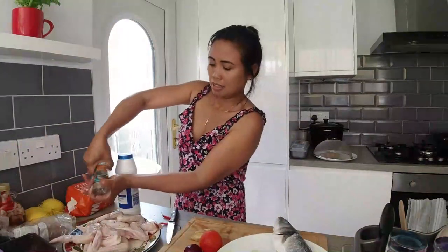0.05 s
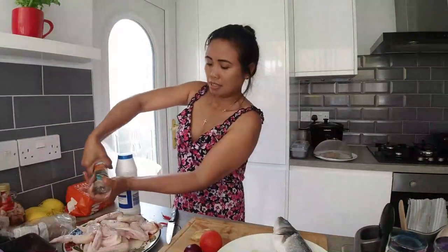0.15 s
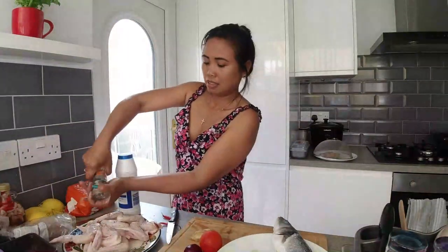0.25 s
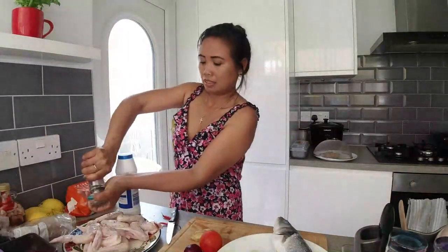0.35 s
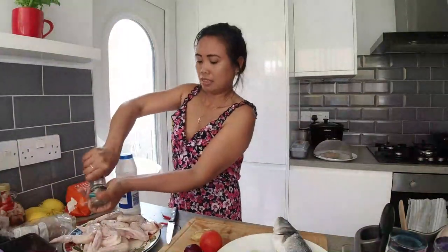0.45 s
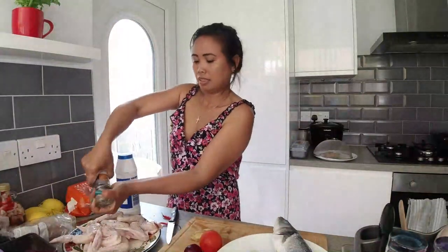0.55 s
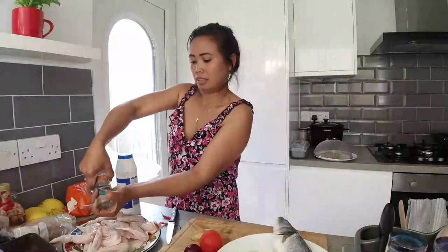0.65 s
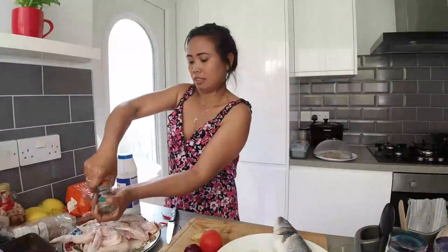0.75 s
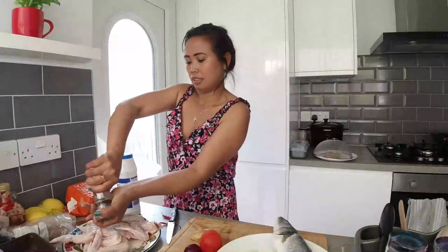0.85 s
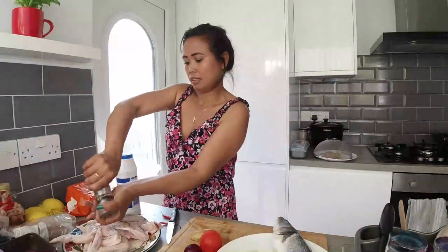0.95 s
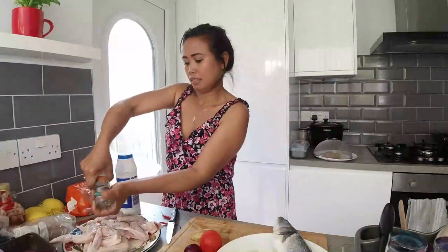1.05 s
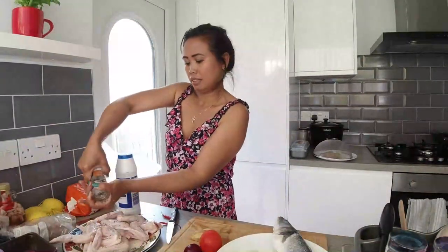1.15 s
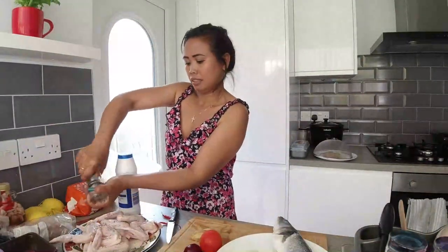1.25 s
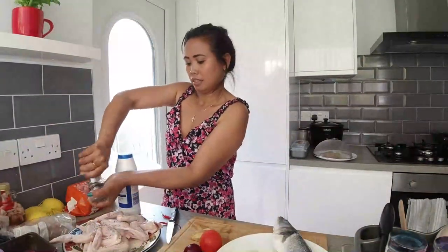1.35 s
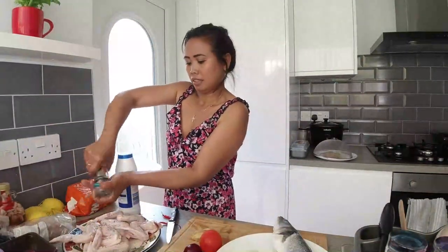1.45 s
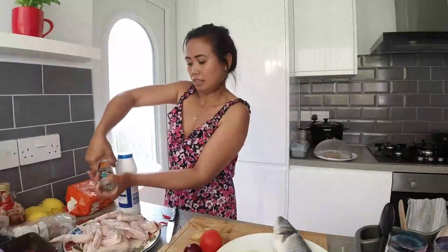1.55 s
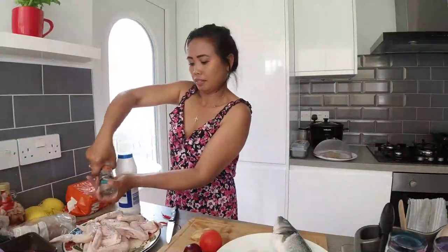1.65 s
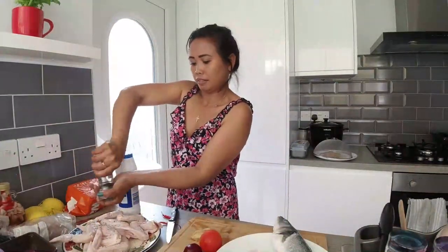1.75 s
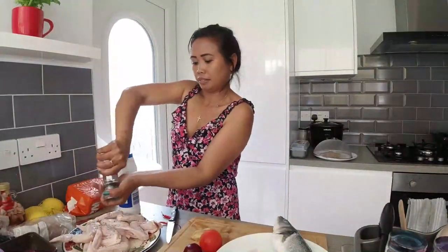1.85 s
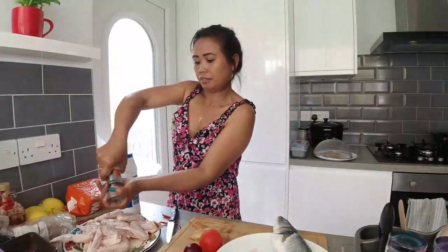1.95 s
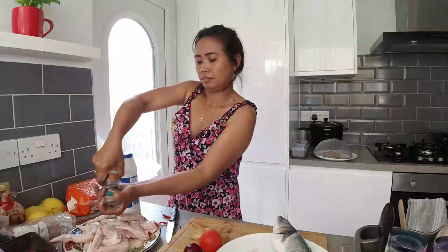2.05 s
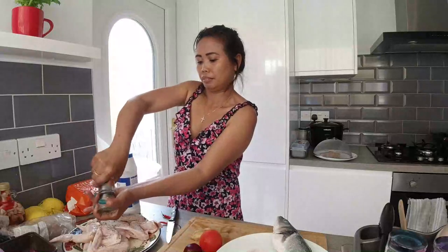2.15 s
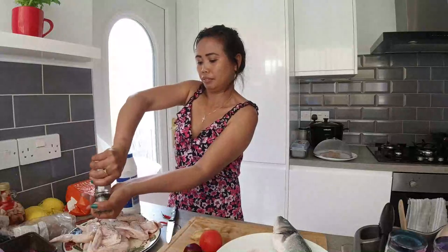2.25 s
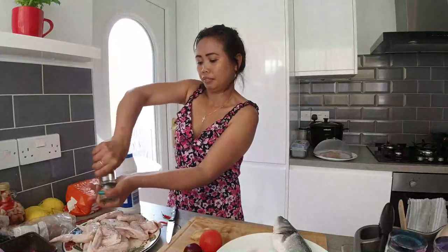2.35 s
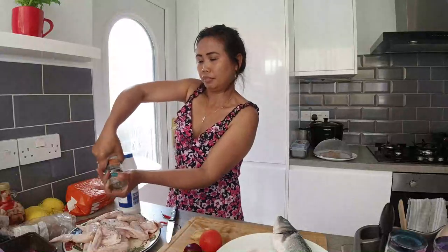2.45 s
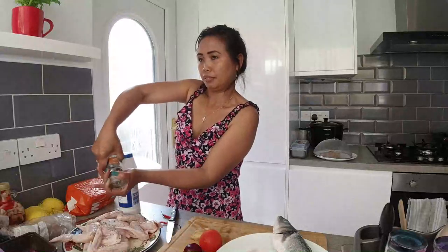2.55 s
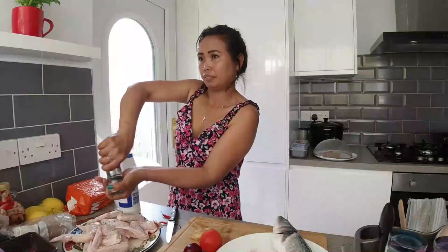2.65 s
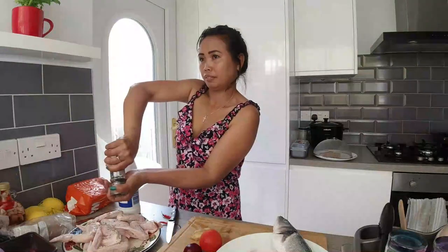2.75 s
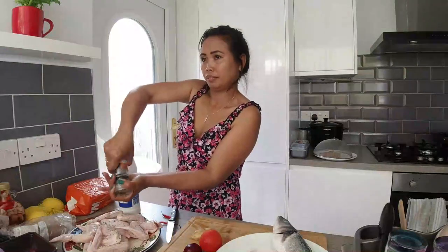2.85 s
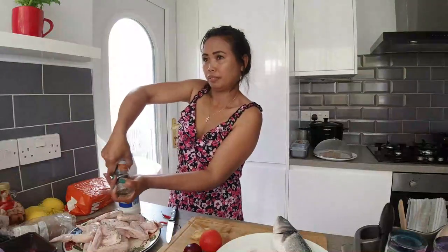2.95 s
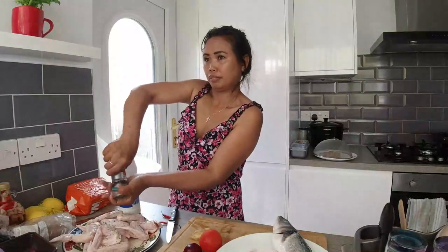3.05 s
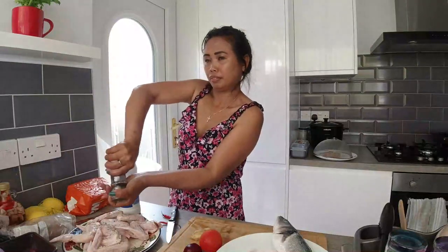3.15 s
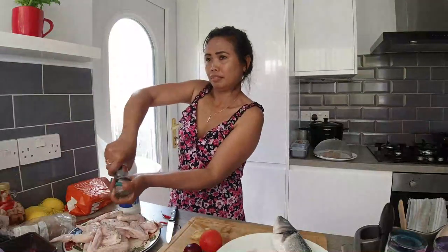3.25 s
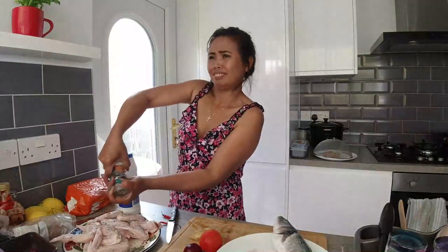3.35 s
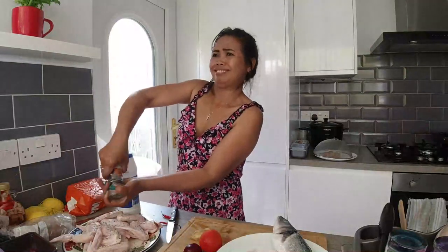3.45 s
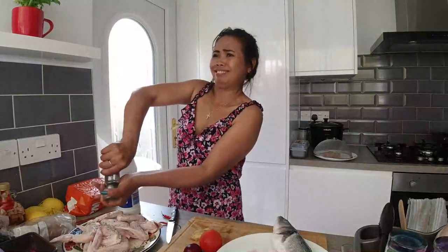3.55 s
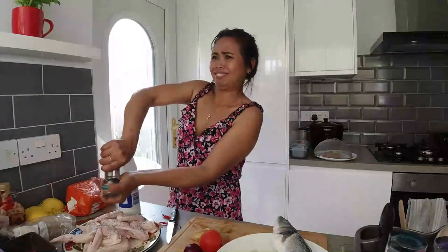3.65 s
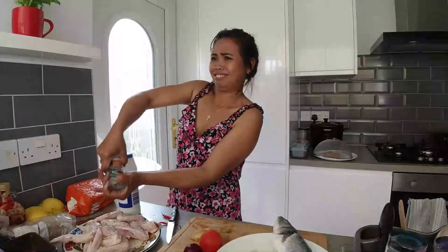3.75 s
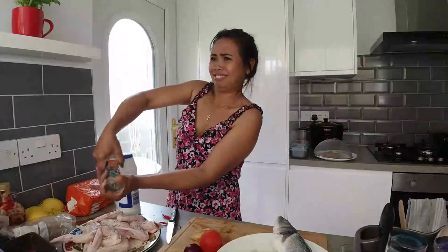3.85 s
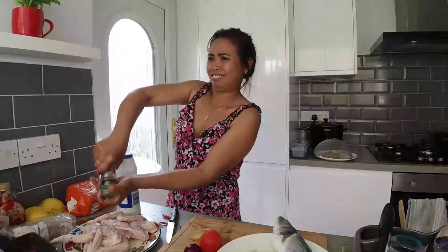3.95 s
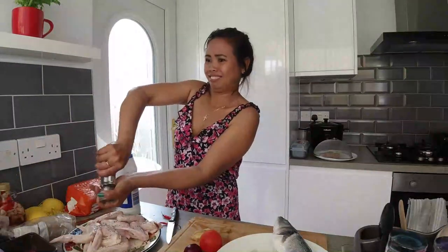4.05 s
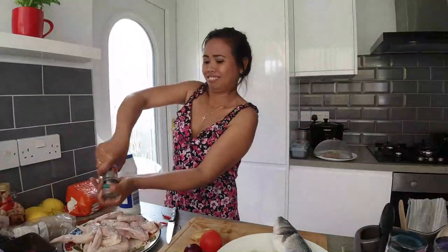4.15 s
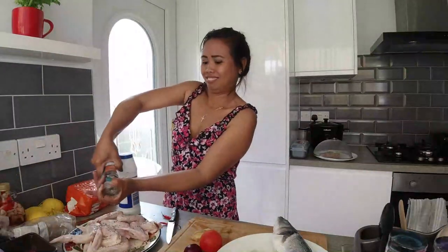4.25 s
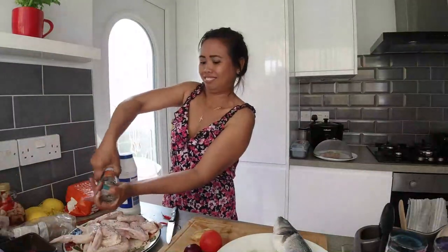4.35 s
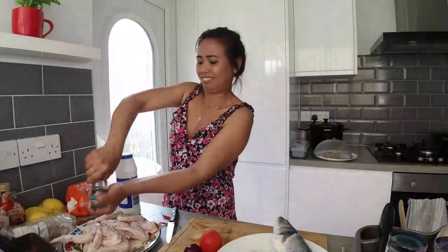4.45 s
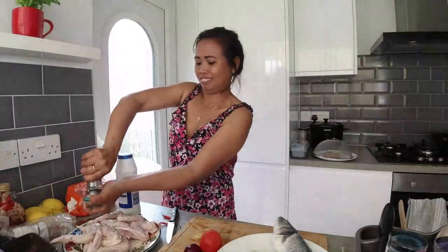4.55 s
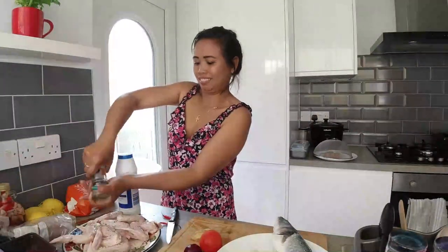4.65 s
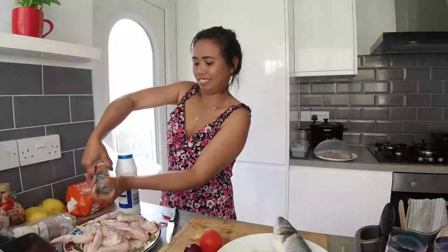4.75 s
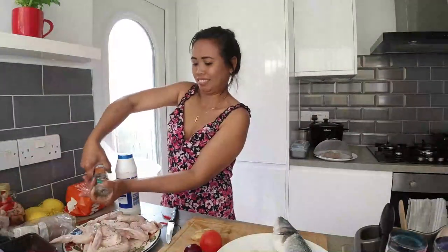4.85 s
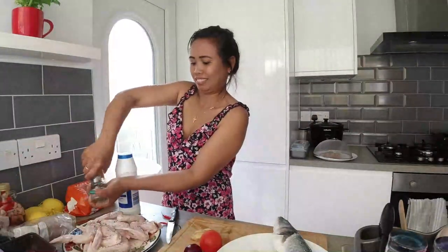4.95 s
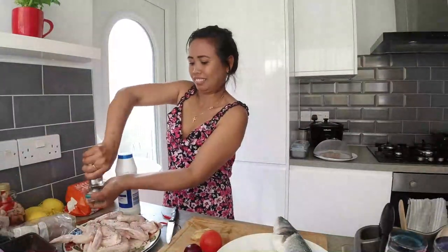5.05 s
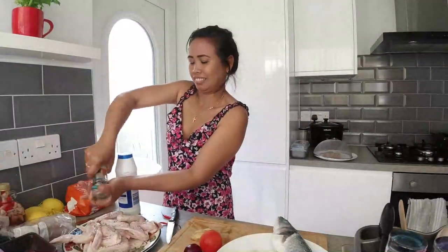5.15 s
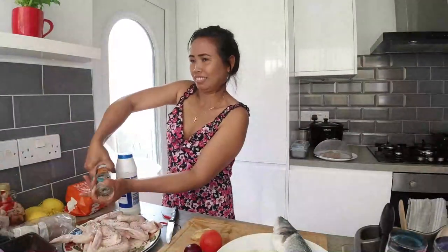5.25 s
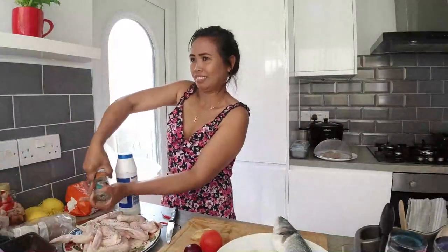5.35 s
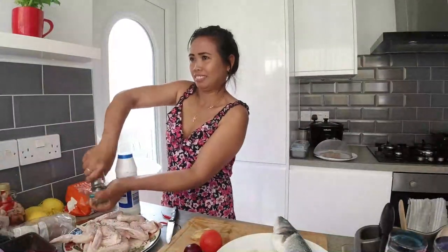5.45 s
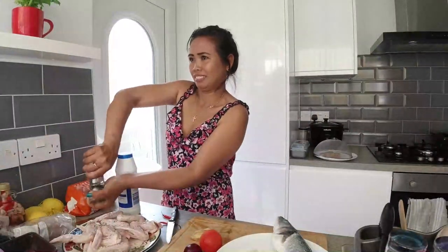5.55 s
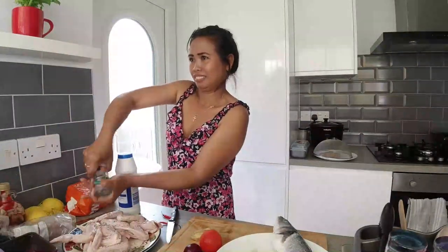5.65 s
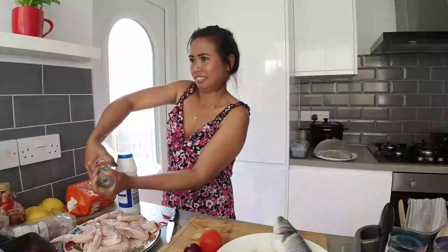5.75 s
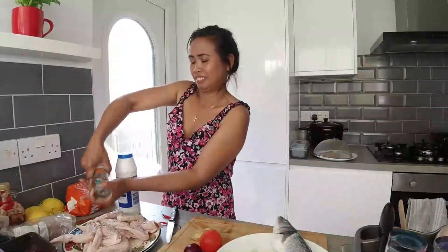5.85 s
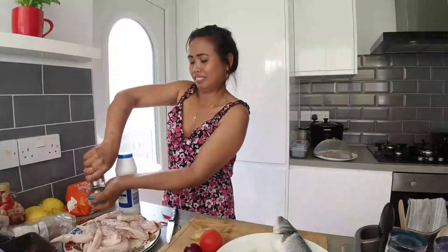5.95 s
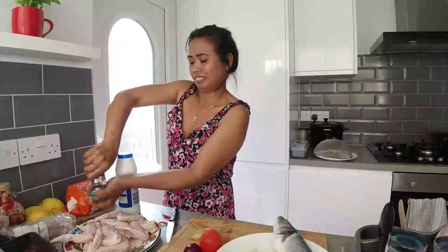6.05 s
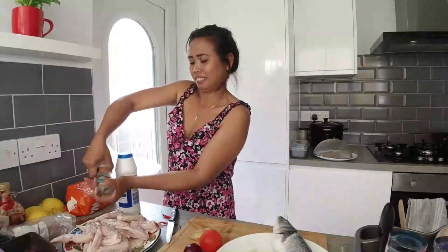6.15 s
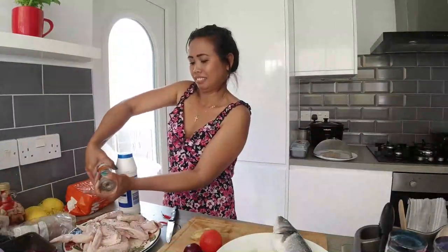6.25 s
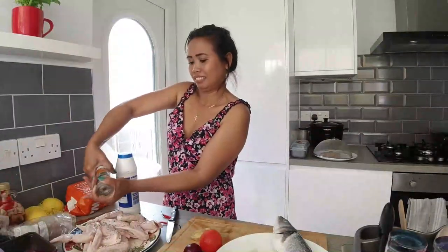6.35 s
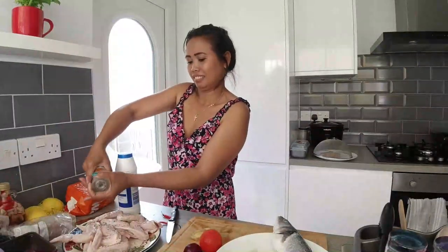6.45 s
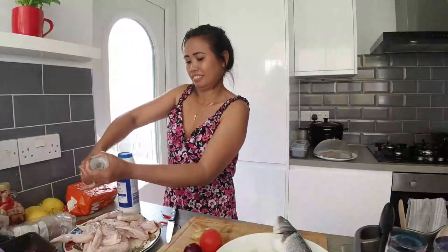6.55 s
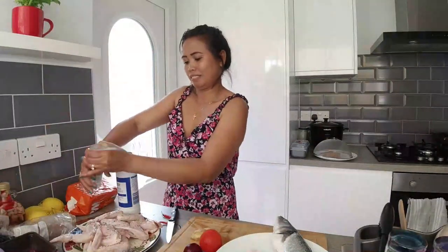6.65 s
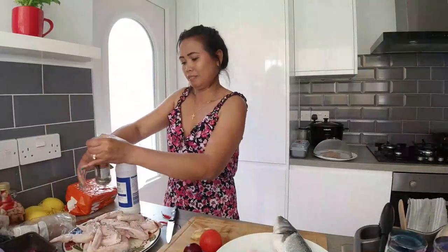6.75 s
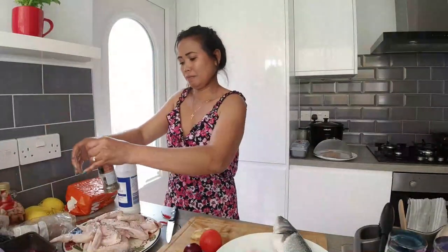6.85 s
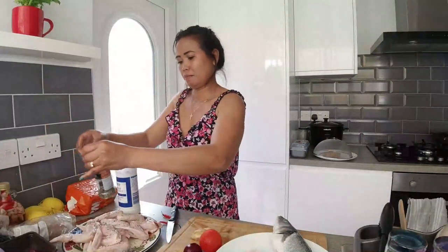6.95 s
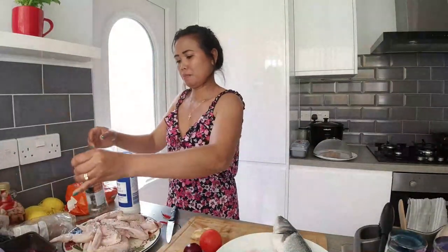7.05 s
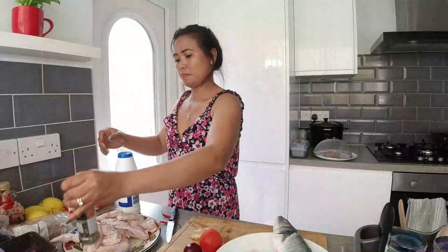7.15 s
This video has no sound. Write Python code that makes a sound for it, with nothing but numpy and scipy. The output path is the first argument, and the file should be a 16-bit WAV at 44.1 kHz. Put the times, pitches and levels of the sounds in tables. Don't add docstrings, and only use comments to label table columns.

```python
import sys
import numpy as np
from scipy import signal
from scipy.fft import rfft, irfft, next_fast_len
from scipy.io import wavfile
from scipy.ndimage import uniform_filter1d

SR = 44100
rng = np.random.default_rng(int(sys.argv[2]) if len(sys.argv) > 2 else 0)


def master(y):
    cut = np.clip(np.atleast_2d(y).T, -1, 1)
    pcm = np.round(cut * 32767)
    wavfile.write(sys.argv[1], SR, pcm.astype(np.int16))


def makeup_ratio(level_db):
    decades = np.asarray(level_db, float) / 20
    return 10 ** decades


N = 317520


def evened(x):
    return x / np.sqrt(np.mean(x ** 2) + 1e-20)


def wander(shape, size):
    smooth = uniform_filter1d(rng.standard_normal(shape), size=size)
    return evened(uniform_filter1d(smooth, size=size))


def read(points, hz, count=1):
    table = np.transpose(points)
    return np.interp(np.log(hz + 1), np.log(table[0] + 1), table[count])


def resonate(x, hz, width):
    return signal.lfilter(*signal.iirpeak(hz, hz / width, SR), x)


def ring(part):
    edges_hz, broad_db, modes = part
    band = signal.butter(2, edges_hz, "band", fs=SR, output="sos")
    tap = signal.sosfilt(band, np.eye(1, 2048)[0])
    out = makeup_ratio(broad_db) * evened(tap)
    for hz, width_hz, level_db in modes:
        out = out + makeup_ratio(level_db) * evened(resonate(tap, hz, width_hz))
    return out / np.linalg.norm(out)


# frequency_hz, density_db (per Hz)
AIR = [(20, -1.5), (60, -13.5), (170, -6.5), (380, -21), (900, -30.5), (5400, -45.5), (10000, -51.5),
       (16000, -60)]
# frequency_hz, likeness (0 to 1)
AIR_SAME = [(60, 0.92), (400, 0.97), (1500, 0.54), (5000, 0.15)]


def air():
    hz = np.fft.rfftfreq(N, 1 / SR)
    a, b = rfft(rng.standard_normal((2, N)))
    same = np.clip(read(AIR_SAME, hz), 0, 1)
    pair = np.array([a, same * a + np.sqrt(1 - same ** 2) * b])
    return makeup_ratio(-54) * evened(irfft(pair * makeup_ratio(read(AIR, hz)), N))


# frequency_hz, width_hz, level_db
HUM = [(49.95, 6.5, -55.5), (98, 11, -63), (135.1, 4.7, -58.5), (231.4, 18, -50.5), (274, 16, -57),
       (344.7, 10, -63.5)]


def fridge():
    out = np.zeros(N)
    for hz, width_hz, level_db in HUM:
        tone = resonate(resonate(rng.standard_normal(N), hz, width_hz), hz, width_hz)
        out += makeup_ratio(level_db) * evened(tone)
    return out


# frequency_hz, t60_s, level_db
KITCHEN = [(200, 0.086, -1), (803, 0.18, 0.6), (2710, 0.26, -0.5), (5890, 0.19, 0.4), (10300, 0.14, 3),
           (15000, 0.11, 3)]


def kitchen(x):
    size = SR // 2
    taps = np.zeros((2, size))
    at = np.arange(120, size - 20, 16) + rng.integers(0, 16, (2, (size - 141) // 16 + 1))
    np.put_along_axis(taps, at, rng.choice([-1., 1.], at.shape), 1)
    build_up = 1 - np.exp(-np.arange(size) / SR / 0.0009)
    hz, t, z = signal.stft(taps * build_up, SR, nperseg=128)
    same = np.clip(read(AIR_SAME, hz), 0, 1)[:, None]
    z[1] = same * z[0] + np.sqrt(1 - same ** 2) * z[1]
    decay_db = read(KITCHEN, hz, count=2)[:, None] - 60 * t / read(KITCHEN, hz)[:, None]
    tail = signal.istft(z * makeup_ratio(decay_db), SR, nperseg=128)[1]
    return signal.oaconvolve(x[None], tail / np.linalg.norm(tail[0]), axes=1)[:, :N]


def ports(x):
    lag_s = 5.5e-5
    size = next_fast_len(N)
    phase = np.exp(-2j * np.pi * np.fft.rfftfreq(size, 1 / SR) * lag_s)
    return np.array([x, irfft(rfft(x, size) * phase, size)[:N]])


# frequency_hz, level_db, t60_s
KNOCK = [(106, -27.5, 0.37), (244, -28, 0.2), (130, -34.5, 0.15)]


def knock():
    start_s = 5.108
    t = np.maximum(np.arange(N) / SR - start_s, 0)
    out = np.zeros(N)
    for (hz, level_db, t60_s), waver in zip(KNOCK, wander((len(KNOCK), N), 500)):
        decay = makeup_ratio(level_db - 60 * t / t60_s + 1.6 * waver)
        out -= decay * np.sin(2 * np.pi * hz * t + 1.1 * waver)
    return out * (1 - np.exp(-t / 0.0018))


# time_s, level_db
SCRAPE = [
    (6.79, -111),
    (6.808, -73),
    (6.849, -49),
    (6.9, -48),
    (6.974, -67),
    (6.982, -111),
    (7.02, -110),
]
# frequency_hz, width_hz, level_db
CAP = [(1963, 4200, -15.5), (3900, 150, -23.5), (6430, 90, -2), (9400, 1200, -16.5), (11500, 870, -25.5),
       (13560, 550, -5.5)]


def cap():
    s, db = np.transpose(SCRAPE)
    rub = rng.standard_normal(N) * makeup_ratio(np.interp(np.arange(N) / SR, s, db, -120, -120))
    out = np.zeros(N)
    for hz, width_hz, level_db in CAP:
        same_power = np.sqrt(SR / (np.pi * width_hz))
        out += makeup_ratio(level_db) * same_power * resonate(resonate(rub, hz, width_hz), hz, width_hz)
    return out


# start_s, level_db, pitch_hz
JOLTS = [(0.088, -26, 546), (0.115, -13.5, 600), (0.713, -27, 630), (1.171, -17.5, 595),
         (1.216, -18.5, 276), (1.578, -25.5, 610), (1.873, -18, 274), (2.978, -24, 594),
         (3.185, -25.5, 313), (3.376, -22.5, 392), (3.627, -24.5, 396), (3.84, -19.5, 560),
         (3.874, -20.5, 288), (4.372, -25, 618), (5.32, -33, 607), (6.551, -31.5, 650)]


def jolts():
    t60_s, jolt_db = 0.03, 1
    out, t = np.zeros(N + 4000), np.arange(4000) / SR
    for start_s, level_db, hz in JOLTS:
        at = round(start_s * SR)
        decay = makeup_ratio(level_db + jolt_db - 60 * t / t60_s)
        out[at:at + 4000] += decay * np.sin(2 * np.pi * hz * t) * (1 - np.exp(-t / 0.0012))
    return out[:N]


# full_force_s, rise_s, hold_s, grit_db, jar_share_db
PUSHES = [(0.119, 0.054, 0.014, -20.5, 5.5), (0.614, 0.05, 0.012, -32.5, 8), (0.708, 0.075, .01, -33, 9.5),
          (1.122, 0.066, 0.092, -30.5, 3.5), (1.588, 0.067, 0.044, -26.5, 2),
          (2.041, 0.079, 0.086, -29, -1.5), (2.513, 0.047, 0.0035, -21, 1), (2.928, 0.053, 0.15, -33, 6.5),
          (3.385, 0.15, 0.012, -31.5, 3), (3.829, 0.036, .11, -26.5, 4.5), (4.305, 0.09, 0.033, -25.5, 5.5),
          (4.785, 0.042, 0.051, -30.5, 3), (5.269, 0.035, 0.079, -28, 8.5),
          (5.773, 0.089, 0.09, -28.5, 3.5), (6.217, 0.034, 0.016, -27.5, 7.5),
          (6.323, 0.038, 0.0067, -28, 9)]
# full_force_s, rise_s, hold_s, grit_db, jar_share_db
RETURNS = [(0.0, .03, 0.0024, -43, 2), (0.462, 0.14, 0.0085, -31, -1), (0.936, 0.15, .02, -36.5, 4),
           (1.434, 0.15, 0.0093, -35.5, 3.5), (1.862, 0.12, 0.0078, -25.5, -3),
           (2.274, .02, 0.09, -29.5, -5), (2.776, 0.16, .03, -37, 0.5), (3.183, 0.04, 0.0038, -26, -8),
           (3.627, 0.045, 0.013, -33, 0), (4.072, 0.091, 0.015, -35, -1.5),
           (4.567, .12, 0.0074, -38.5, 0.5), (5.069, .08, 0.0086, -37.5, -2.5),
           (5.6, 0.18, 0.011, -36.5, -3), (6.015, 0.17, 0.06, -40.5, 1), (6.523, 0.073, 0.035, -43.5, -7)]


def strokes():
    rise_db, sag_db_per_s, firm_from_db = 30, 56, -26.5
    body_per_db, jar_per_db, fizz_per_db = -0.06, 0.15, 0.3
    t = np.arange(0, N, 64) / SR
    # fall (dB/s), body share (dB), fizz share (dB)
    rows = [(*r, 189.5, 2, 1.5) for r in PUSHES]
    rows += [(*r, 212.5, -2, -1.5) for r in RETURNS]
    s, rise, hold, db, jar_db, fall, body_db, fizz_db = np.transpose(rows)[:, :, None]
    rising_db = rise_db * np.maximum(s - t, 0) / rise
    sag_db = sag_db_per_s * np.clip(t - s, 0, hold)
    falling_db = fall * np.maximum(t - s - hold, 0)
    power = makeup_ratio(db - rising_db - sag_db - falling_db) ** 2 + 1e-30
    total = power.sum(0)
    level_db = np.maximum(10 * np.log10(total), -90)
    firm_db = level_db - firm_from_db
    columns = [level_db]
    for share_db, per_db in ((body_db, body_per_db), (jar_db, jar_per_db), (fizz_db, fizz_per_db)):
        columns.append((power * share_db).sum(0) / total + per_db * firm_db)
    return [np.interp(np.arange(N) / SR, t, c) for c in columns]


# start_s, burr_db, shell_share_db, jar_share_db, pitch_hz
SNAPS = [(0.1153, -25, 6.5, 1, 5700), (0.1432, -26.5, -4, 17, 3320), (0.465, -18, -14, -29, 5880),
         (0.6171, -15.5, -6, -2, 3150), (0.9441, -20.5, -4.5, -14, 3900), (1.1734, -24, 11, 17.5, 3900),
         (1.4324, -22, -7.5, -12, 6400), (1.8749, -16, -2, -2, 5200), (2.1021, -13, -1, -9.5, 5450),
         (2.3316, -18.5, 3, -2, 3900), (2.506, -15.5, -9, -1.5, 5950), (2.9224, -16, -12, -0.5, 3740),
         (2.9798, -15, -5.5, 2, 3740), (3.1884, -17, -11, 0, 4520), (3.3929, -22, 2.5, 7, 3830),
         (3.843, -18.5, -1, 9.5, 4140), (3.902, -16.5, 1, 11, 4820), (4.3083, -15, -7.5, 1, 6470),
         (4.3359, -14, 2.5, 5, 3490), (5.2808, -16, -8, -10.5, 6130), (5.3219, -17, -2, 9, 3520),
         (5.5717, -18, -0.5, -8.5, 6100), (5.843, -18, 2.5, 12, 3650), (6.3318, -16.5, -0.5, 3.5, 4770)]
# start_s, burr_db, jar_share_db, pitch_hz
CRUNCHES = [(0.0873, -28, -1, 3500), (0.1581, -31, 20, 3380), (0.632, -22.5, -8, 3900),
            (0.6978, -23.5, 2, 4050), (0.7221, -29, 16, 3700), (1.1197, -28.5, 14.5, 5460),
            (1.2064, -41.5, 17, 5660), (1.5805, -25.5, -7, 3520), (1.64, -19, 4.5, 6300),
            (1.6699, -18.5, 1.5, 6000), (2.046, -25.5, 6, 4600), (2.2777, -24, -1.5, 5340),
            (2.5565, -23, -1, 3760), (2.954, -25.5, 8.5, 3830), (2.988, -18, 12.5, 3440),
            (3.0024, -20, 9.5, 6330), (3.2598, -23.5, -3.5, 4020), (3.6282, -26, -6.5, 5650),
            (3.811, -24, -15, 6400), (3.8544, -19.5, 13, 3550), (3.9217, -19, 3.5, 6520),
            (4.2715, -21, 4, 3380), (4.292, -21, -19, 3920), (4.3729, -23, 15, 3440),
            (5.061, -27.5, -10, 5730), (5.7716, -23, -4, 3950), (5.8282, -36.5, 21.5, 3650),
            (6.2123, -30, 14.5, 3400), (6.2205, -19, 6, 3460), (6.3487, -22, 10.5, 4470)]
# start_s, burr_db, jar_share_db
CHIPS = [(0.1006, -31.5, 10), (0.439, -30.5, -12), (0.5784, -31, -3), (0.6465, -20, 5.5),
         (0.9318, -34.5, 4), (1.1486, -36, 25), (1.5937, -30.5, 14), (1.8568, -36, -11.5), (2.0132, -34, 4),
         (2.035, -36, -4), (2.3262, -36, 16), (2.493, -28, 6), (2.8107, -33.5, 8), (3.0171, -18.5, 0),
         (3.3347, -28.5, -16), (3.3752, -23.5, 1), (3.8774, -32, 12), (4.0797, -28.5, -17),
         (4.3847, -41, 17.5), (4.7794, -31, -5), (4.7942, -24, -16), (5.2556, -31.5, 2), (5.272, -36, -7),
         (5.4016, -33, 10), (5.7469, -26.5, -11), (5.7832, -27.5, 11), (5.9825, -29.5, -1),
         (6.1947, -26.5, 1), (6.5163, -38, 0), (6.5517, -41, 7)]


def grains():
    snaps = [(s, db, shell_db, jar_db, -2, hz) for s, db, shell_db, jar_db, hz in SNAPS]
    crunches = [(s, db, -1.5, jar_db, 0, hz) for s, db, jar_db, hz in CRUNCHES]
    chips = [(s, db, -3, jar_db, -4.5, 3640) for s, db, jar_db in CHIPS]
    return snaps + crunches + chips


def stalls():
    stall_s, stall_db, from_db = .012, -5, -34
    load = np.zeros(N)
    size = round(stall_s * SR) + 1
    for s, db, *_ in grains():
        at = round(s * SR)
        ramp = np.linspace(.3, 1, size) * np.clip((db - from_db) / 14, 0, 1)
        load[at - size:at] = np.maximum(load[at - size:at], ramp)
    return stall_db * load


def shares(burr_db, body_db, jar_db, fizz_db):
    return makeup_ratio(burr_db + np.array([body_db, jar_db, 0 * burr_db, fizz_db]))


SPIKY = [
    [.2],
    [.5],
    [.7],
    [.9],
]
CLUMP_DB = [
    [2.5],
    [3],
    [4],
    [5],
]


def grit():
    ticks_per_s, spread_db, slip_db, grit_db = 810, 8.5, 2, -5
    spread = spread_db * np.array(SPIKY) * np.minimum(rng.exponential(1, N), 2.8)
    size = makeup_ratio(spread) * (rng.random(N) < ticks_per_s / SR)
    clumps = makeup_ratio(np.array(CLUMP_DB) * evened(uniform_filter1d(rng.standard_normal((4, N)), size=260)))
    ticks = size * rng.standard_normal((4, N)) + 1.8 * rng.standard_normal((4, N))
    slips = makeup_ratio(slip_db * evened(uniform_filter1d(rng.standard_normal(N), size=130)))
    force = np.array([evened(row) for row in ticks * clumps * slips])
    return makeup_ratio(grit_db + stalls()) * force * shares(*strokes())


# band edges_hz, broad_db, modes of frequency_hz, width_hz, level_db
JAR = (1720, 4200), -1, [(2704, 86, 10.5), (2694, 59, 7.5), (2713, 600, -19), (3056, 240, -5.5)]


def gripped(shift):
    edges_hz, broad_db, modes = JAR
    return ring((edges_hz, broad_db, [(f * shift, w, db) for f, w, db in modes]))


# band edges_hz, broad_db, modes of frequency_hz, width_hz, level_db
SHELL = (1290, 2240), 1.2, [(1413, 42, -5), (1984, 57, -8.4)]
BURR = (3080, 9140), 0.9, [(3900, 2500, -8.5), (5335, 660, -4.5), (6220, 410, -3)]
FIZZ = (8400, 12460), 1.5, [(9340, 1400, -6.5), (10740, 250, -13.5), (14540, 830, -3)]
GRIPS = (0.977, 0.993, 1.026, 1.069)


def cracks():
    crack_s, crack_db, first_tick = 0.0044, -6, 1.7
    grain_width_hz, ping_per_db = 420, .3
    size = 1500
    out, t = np.zeros(N + size), np.arange(size) / SR
    held = [np.array([ring(SHELL), gripped(g), ring(BURR), ring(FIZZ)])[:, :size] for g in GRIPS]
    envelope = np.exp(-t / crack_s) * (1 - np.exp(-t / 0.00015))
    for s, *levels, hz in grains():
        parts = held[rng.integers(len(GRIPS))]
        burst = rng.standard_normal((4, size))
        steps = makeup_ratio(4.1 * evened(uniform_filter1d(rng.standard_normal(size), size=24)))
        snap = first_tick * np.sign(burst) * np.exp(-t / .0004)
        blow = (burst + snap) * steps * envelope
        rung = [*signal.fftconvolve(blow, parts, axes=1)[:, :size], resonate(blow[2], hz, grain_width_hz)]
        ping_db = levels[0] + ping_per_db * (levels[0] + 22)
        gains = [*shares(*levels), makeup_ratio(ping_db)]
        at = round(s * SR)
        out[at:at + size] += sum(g * evened(r) for g, r in zip(gains, rung)) * np.sqrt(220 / size)
    return makeup_ratio(crack_db) * out[:N]


def patchy(x):
    z = signal.stft(x, SR, nperseg=128)[2]
    smooth = uniform_filter1d(rng.standard_normal(z.shape), size=3, axis=0)
    patches = evened(uniform_filter1d(smooth, size=9, axis=1))
    return signal.istft(z * makeup_ratio(3.67 * patches - 1.7), SR, nperseg=128)[1][:N]


# band edges_hz, broad_db, modes of frequency_hz, width_hz, level_db
BODY = (280, 2000), 9.8, [(614, 90, -12), (1442, 110, -5), (400, 240, -16)]


def grinder():
    body, jar, burr, fizz = grit()
    hold = makeup_ratio(5 * wander((len(GRIPS), N), 700))
    hold = hold / np.linalg.norm(hold, axis=0)
    rub = np.zeros(N)
    for force, part in ((body, BODY), (burr, BURR), (fizz, FIZZ)):
        rub += signal.oaconvolve(force, ring(part))[:N]
    for h, g in zip(hold, GRIPS):
        rub += signal.oaconvolve(jar * h, gripped(g))[:N]
    return patchy(rub) + cracks() + jolts()


def scene():
    sway_hz, kitchen_db = 2.3, -1
    near = grinder() + cap()
    turn = 2 * np.pi * sway_hz * np.arange(N) / SR
    echoes = kitchen(near * np.cos(turn)) + kitchen(near * np.sin(turn))
    return ports(near) + makeup_ratio(kitchen_db) * echoes + knock() + fridge() + air()


def band_limit(x):
    return signal.sosfilt(signal.butter(12, 16810, fs=SR, output="sos"), x)


def record(dry):
    held = np.tanh(dry / 1.1) * 1.1
    edge = signal.firwin(255, 16250, window=("kaiser", 8), fs=SR)
    mix = signal.oaconvolve(held, edge[None], "same")
    return band_limit(mix)


dry = scene()
out = record(dry)
master(out)
```